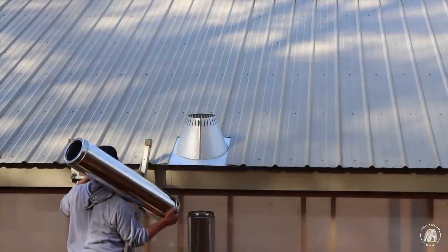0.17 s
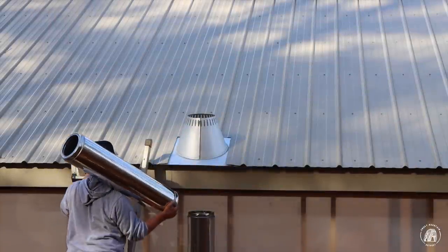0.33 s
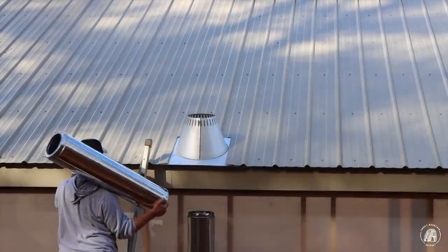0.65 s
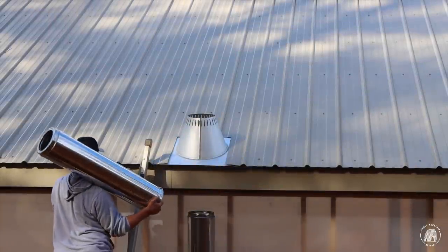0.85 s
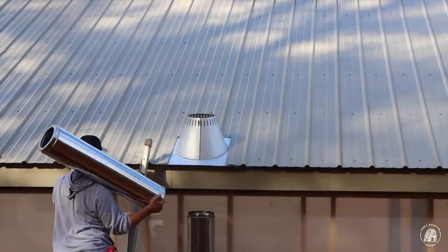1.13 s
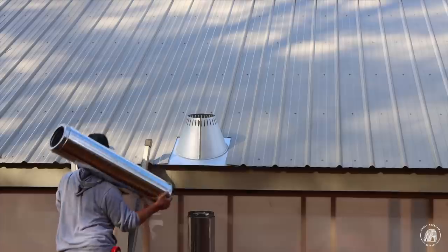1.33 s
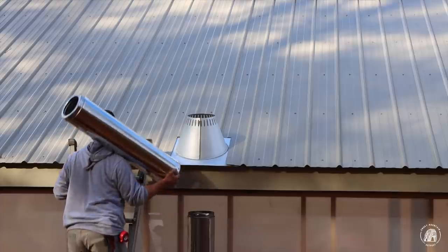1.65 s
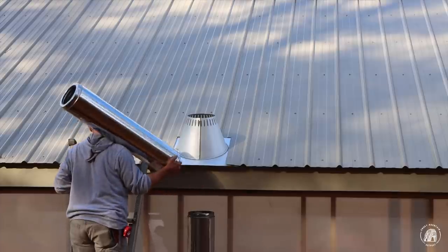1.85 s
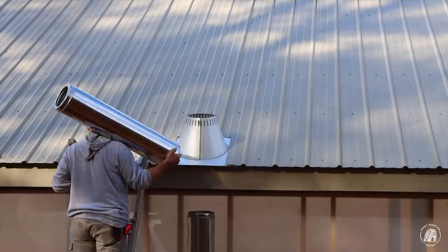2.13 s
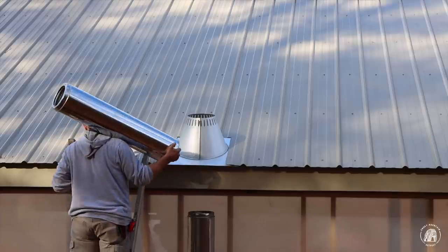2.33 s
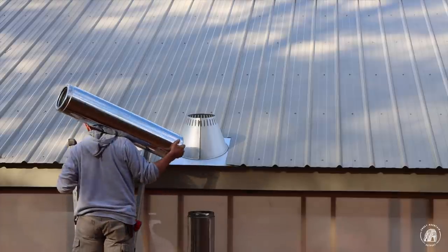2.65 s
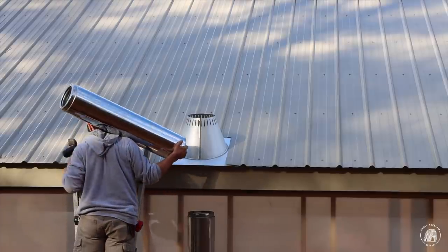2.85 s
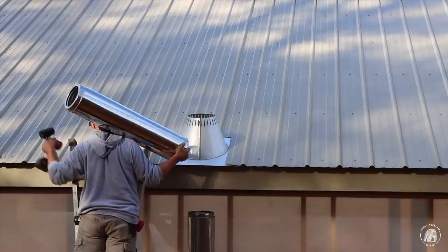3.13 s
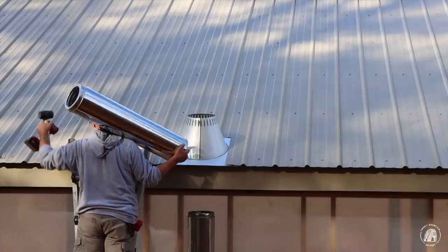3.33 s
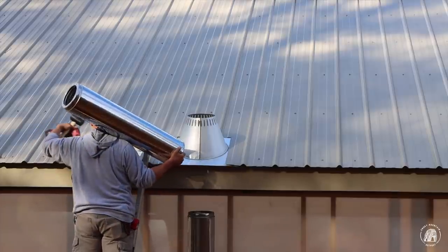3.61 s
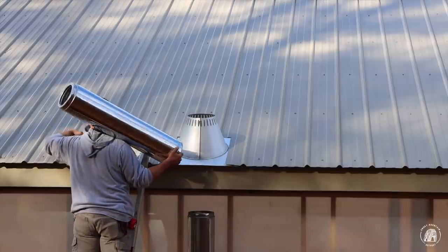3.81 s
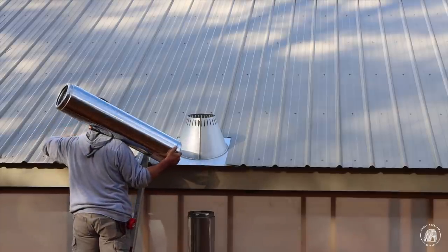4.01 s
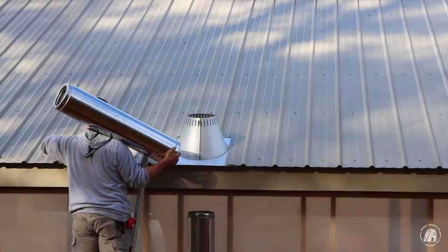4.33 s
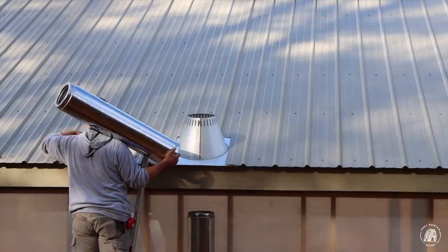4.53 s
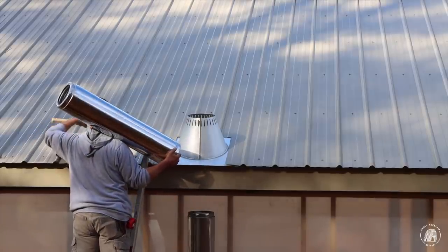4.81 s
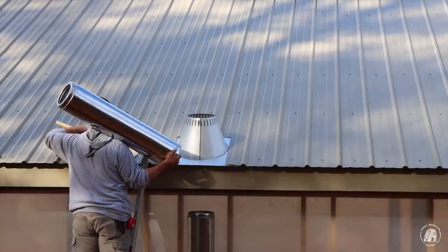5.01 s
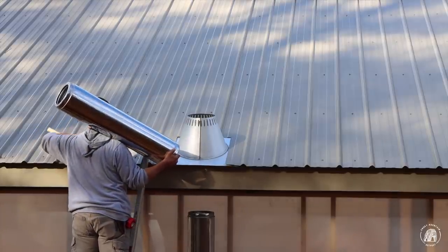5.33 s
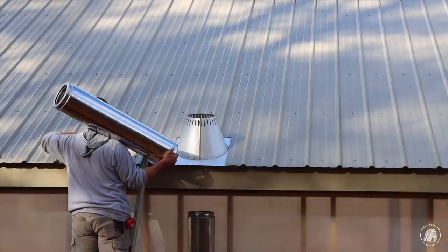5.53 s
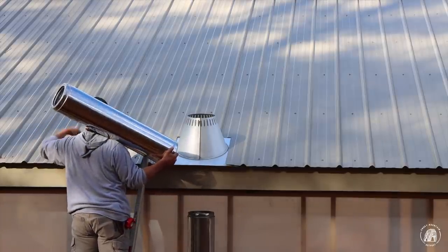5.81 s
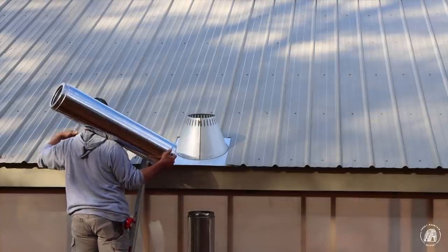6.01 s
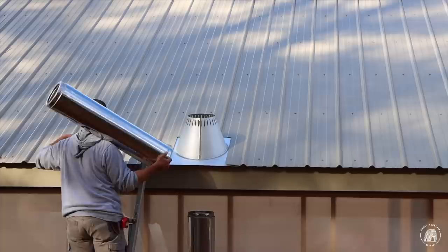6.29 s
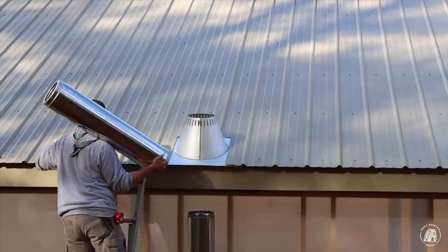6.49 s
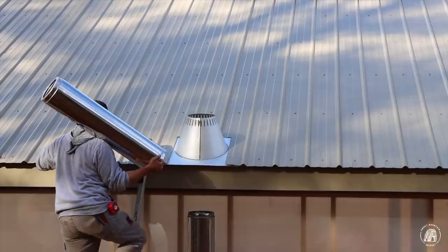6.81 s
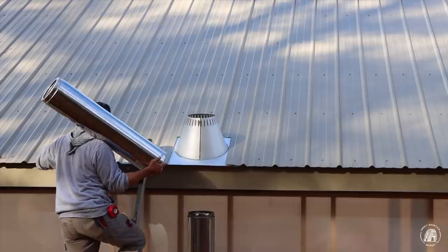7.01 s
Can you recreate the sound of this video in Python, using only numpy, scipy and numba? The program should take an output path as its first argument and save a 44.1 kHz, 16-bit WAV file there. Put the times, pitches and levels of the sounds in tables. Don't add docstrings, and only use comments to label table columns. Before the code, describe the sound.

Quiet outdoor air with low rumble and light hiss, heard in mono from a modest distance. At about 0.06 s a bright aluminium rung clinks, then irregular dull ticks, soft boot thuds and gritty cloth rubbing continue, with another clink at 0.72 and a fuller step around 2.0 to 2.1. From 2.5 to 3.9 it is nearly quiet, with only faint touches and rustle. A low thud at 3.94 leads to a hollow, clattering tool blow on sheet metal at 4.15, with a short sizzle. Duller thuds follow at 4.43 and 4.73 to 4.8. The pipe knocks twice near 5.4, then lands hardest at 5.6: a sharp crack, booming rebounds and loose rattle dying by about 6. Soft rubbing remains, with a tiny tick at 6.5, a latch click at 6.81, and a bright rung clink and step at 7.0. A faint, dull yard echo trails the hits.

```python
import sys
import numpy as np
from scipy import signal
from scipy.fft import rfft, irfft
from scipy.io import wavfile
from scipy.ndimage import uniform_filter1d
from numba import njit

SR = 44100
rng = np.random.default_rng(int(sys.argv[2]) if len(sys.argv) > 2 else 0)


def waveform_to_disk(signal):
    frames = np.transpose(np.atleast_2d(signal))
    scaled = np.clip(frames, -1, 1) * 32767
    samples = np.round(scaled).astype(np.int16)
    wavfile.write(sys.argv[1], SR, samples)


def gain_from_db(level_db):
    decades = np.asarray(level_db, float) / 20
    return 10 ** decades


N = 315315

# mode_hz, level_db_per_hz
SHEET_BOOM = [(35, -46), (60, -34), (129, 0.5), (172, -7), (280, 0.5), (398, -6.5), (429, -4.5),
              (545, -2.5), (1050, -9), (1560, -39), (2640, -120)]
# mode_hz, level_db_per_hz
SHEET_CLANG = [(710, -16), (1200, 1), (1330, -1), (1420, -14), (1610, -15.5), (2120, -11.5), (2390, -11.5),
               (2980, -15), (3600, -17.5), (4200, -24.5), (5790, -34.5), (6860, -30), (8130, -54),
               (15000, -62)]
# mode_hz, t60_s
SHEET_T60 = [(100, 1), (300, 0.8), (700, 0.34), (1500, 0.19), (3500, 0.28), (7000, 0.28), (14000, 0.11)]
# mode_hz, level_above_dense_modes_db
PANELS = [(255, 10), (300, 3), (350, 5.5), (400, 14), (495, -4), (550, 5.5), (595, -13), (680, 9.5),
          (778, 8.5), (805, 4), (855, 7)]
# start_s, level_db, treble_share_db, boom_centre_hz, ring_time_factor
CLIMB = [(0.0, -33, -32, 870, 0.46), (0.468, -41, 1, 580, 0.66), (0.493, -33.5, -15, 276, 0.19),
         (0.7196, -38.5, 12, 760, 0.42), (0.859, -38, 1, 920, 0.54), (0.931, -41, -3, 460, 0.42),
         (1.148, -36.5, 6, 605, 1), (1.213, -35, -1, 740, 1.), (1.267, -32.5, -11, 267, 0.78),
         (1.359, -40.5, 20, 735, 0.71), (1.514, -29.5, -6.5, 890, 0.91), (1.577, -39, -9, 734, 0.69),
         (1.803, -39.5, 14, 845, 0.27), (1.959, -30.5, -16, 398, 0.79), (2.048, -25.5, -11, 900, 0.54),
         (2.078, -34.5, -26, 290, 0.99), (2.162, -37, 0, 845, 0.34), (2.267, -43.5, 6, 750, 0.88),
         (2.407, -51, 5, 900, 1.), (2.837, -40.5, -26, 770, 0.98), (3.468, -37.5, -4, 850, 0.44),
         (3.556, -41.5, -1, 800, 0.46)]
# start_s, level_db, treble_share_db, boom_centre_hz, ring_time_factor
BLOWS = [(3.906, -41, 1, 774, 0.9), (3.9401, -19, -28, 268, 0.28), (3.971, -31.5, -17, 275, 0.88),
         (4.02, -30, -25, 297, 0.64), (4.072, -22, -21, 510, 0.81), (4.149, -9.5, -7, 790, 0.63),
         (4.247, -25, -15, 790, 0.66), (4.426, -22.5, -10.5, 296, 0.85), (4.73, -19, -19, 525, 0.68),
         (4.756, -25.5, -15, 470, 0.23), (4.808, -29, -28, 497, 1.), (5.371, -16.5, -17, 360, 0.64),
         (5.397, -13.5, -17, 470, 0.98), (5.561, -13, -10.5, 492, 1.)]
# start_s, level_db, treble_share_db, boom_centre_hz, ring_time_factor
DESCENT = [
    (6.004, -45, -32, 582, 1.),
    (6.96, -35.5, -1, 785, 1.),
    (7.007, -28.5, -4, 770, 0.99),
    (7.073, -27, -15, 886, 0.34),
]
# start_s, level_db, treble_share_db, boom_centre_hz, ring_time_factor
SHAKES = [
    (5.626, -16.5, -11, 554, 0.94),
    (5.665, -10, -20, 574, 0.55),
    (5.706, -14.5, -15, 545, 1.),
]
# start_s, level_db
CLINKS = [
    (0.059, -26.5),
    (0.7222, -28.5),
    (6.8106, -29.5),
    (7.0058, -24.5),
]
# mode_hz, level_db, t60_s
CLINK_MODES = [
    [(2600, -3, 0.045), (3060, -3, 0.11), (3800, -1, 0.069), (3940, -18, 0.062), (4760, -3, 0.072),
     (5280, 9, 0.032), (5550, -7, 0.061), (6200, -11, 0.024)],
    [(2500, -8, 0.073), (3105, 6, 0.094), (3332, -39, 5.0), (3700, -9, 0.09), (3760, 2, 0.061),
     (4660, -2, 0.069), (9189, -35, 0.36)],
    [(2720, 0.5, 0.071), (2930, -20, 0.15), (3380, -34, 0.23), (3750, -12, 0.084), (3980, -9, 0.088),
     (4850, -7, 0.06), (7596, -50, 1.1)],
    [(2760, -4, 0.065), (3160, 0, 0.12), (3710, -4, 0.18), (5060, -20, 0.097), (5250, 6, 0.027),
     (6100, -32, 0.14), (6900, -24, 0.1), (8040, -7, 0.093), (8930, -11, 0.11)],
]
# start_s, level_db, centre_hz, top_share_db
RUNG_TICKS = [(0.057, -20.5, 5060, 13), (0.368, -38, 2050, -25), (0.495, -31.5, 2260, -23),
              (0.542, -37.5, 2230, -20), (0.639, -38, 2080, -23), (0.7221, -30.5, 2500, -17),
              (0.851, -35, 2140, -21), (1.145, -37.5, 2230, -27), (1.2142, -33, 2410, -24),
              (1.263, -35, 1790, -27), (1.3655, -27.5, 2350, -20.5), (1.511, -34.5, 3050, -26),
              (1.805, -33, 2450, -18.5), (1.993, -35, 3120, 25), (2.0162, -25, 2450, -23),
              (2.054, -28.5, 2600, -23), (2.115, -40, 2200, -16), (2.159, -39, 2080, -31),
              (2.26, -48, 2170, -24), (2.38, -44, 2360, -19), (2.429, -43, 2450, -14),
              (2.488, -37.5, 2570, -19), (3.204, -38, 2600, -16), (3.47, -51, 3210, -11),
              (3.562, -47, 3160, -13)]
# start_s, level_db, centre_hz, top_share_db, rattle_s
EDGE_TICKS = [(3.906, -41, 1780, -29, .019), (3.932, -34.5, 1860, -29, 0.021),
              (4.007, -40.5, 2150, -34, 0.011), (4.153, -24, 2110, -21, 0.017), (4.4, -42, 2460, -31, 0.02),
              (4.427, -33, 2390, -37, 0.01), (4.713, -33, 2000, -33, 0.026), (5.393, -34, 2090, -41, 0.019),
              (5.419, -32, 2250, -31, 0.0084), (5.555, -32, 1935, -27, 0.042),
              (5.612, -43, 3200, -20, 0.033), (6.488, -38, 2450, -21, 0.027), (6.764, -43, 2370, -19, .013),
              (6.812, -29.5, 2800, -23, 0.015), (6.97, -50, 2460, -9, .013), (6.997, -24, 2130, -32, 0.018),
              (7.005, -19, 3600, -5, 0.0078), (7.069, -31, 1760, -40, 0.012)]
# start_s, level_db, centre_hz, rattle_s, t60_s
CRACKS = [
    (0.057, -24, 2310, 0.011, 0.04),
    (5.5996, -5.5, 2620, .002, 0.01),
    (5.601, -27, 3100, 0.012, 0.037),
]
# centre_hz, boost_db
CROWDED_BANDS = [(2450, 0.5), (3400, 3.5), (4900, 5.5), (6800, 3)]
# start_s, level_db, mode_hz, t60_s, second_mode_hz
KNOCKS = [
    (0.4935, -36, 350, .035, 800),
    (4.1565, -16.5, 835, .075, 610),
    (5.3725, -18, 345, .06, 560),
    (5.4005, -19, 380, .035, 600),
    (5.5992, -10, 500, .02, 240),
    (5.6022, -5, 680, .085, 520),
    (5.6225, -11, 620, .07, 520),
]
# start_s, level_db, buzz_s
BUZZES = [
    (4.158, -30, 0.015),
    (5.40, -45, 0.031),
    (5.566, -39, 0.019),
    (5.608, -29, 0.02),
    (5.68, -44, 0.025),
]
# mode_hz, level_db, t60_s
PIPE_WALL = [(2600, -7, 0.039), (2450, -9, 0.083), (3266, -2, 0.088), (3470, -8, 0.027), (3450, 6, 0.022),
             (3820, -6.5, 0.056), (4980, -20, 0.04), (5130, -22, 0.03), (7100, -17, 0.024)]
# start_s, level_db, mode_hz, t60_s, damped_after_s
LATCH_PING = (6.813, -44.5, 1900, .55, .105)
# start_s, level_db, mode_hz, t60_s, second_mode_hz
HUMS = [(0.645, -46.5, 814, .06, 1910), (1.214, -43, 269, .5, 704), (1.522, -38.5, 377, .11, 648),
        (2.47, -53, 847, 0.34, 700), (3.953, -26.5, 295, 0.12, 685), (4.733, -24, 620, 0.1, 700),
        (4.785, -31.5, 434.4, 0.38, 500), (6.815, -51, 773, 0.27, 826), (5.6, -21, 960, 0.04, 1250),
        (2.158, -41, 820, 0.05, 1780), (3.905, -46, 762, 0.087, 1255), (4.15, -30, 141, 0.39, 249),
        (4.44, -35, 800, .12, 556), (5.636, -16.5, 285, .1, 560), (5.415, -22, 395, .15, 530),
        (5.405, -29, 830, .12, 700), (5.70, -22, 280, .2, 900), (5.715, -22, 530, .2, 660),
        (6.497, -45, 850, .05, 600), (3.98, -35, 250, .2, 800), (4.185, -24, 800, .12, 620),
        (4.075, -31, 400, .06, 670), (4.765, -24, 500, .06, 400), (4.235, -28, 750, .1, 290),
        (4.105, -34, 255, .2, 830), (4.722, -37, 560, .05, 300), (5.435, -23, 400, .08, 560),
        (5.76, -24, 550, .1, 300)]
# start_s, level_db, centre_hz, t60_s
SNAPS = [
    (2.0503, -39, 2500, 0.025),
    (4.147, -23, 2600, 0.0052),
    (4.4216, -34, 2500, 0.023),
    (5.3738, -33.5, 1180, 0.024),
    (5.557, -31, 1500, .015),
    (6.497, -45.5, 2050, 0.11),
    (6.498, -47, 3060, 0.073),
    (1.9955, -58, 3530, 0.012),
]
# start_s, level_db, centre_hz, chatter_s
CLATTER = [(2.05, -40.5, 2890, 0.015), (2.09, -50.5, 2360, 0.022), (4.157, -27, 2180, 0.016),
           (4.209, -41, 2400, 0.03), (4.424, -36, 2390, 0.017), (4.723, -45, 2320, 0.024),
           (5.376, -33, 1530, 0.029), (5.43, -42, 1720, 0.028), (5.561, -26.5, 1610, 0.023),
           (5.608, -34, 1760, 0.018), (5.668, -31, 1990, 0.022), (5.731, -41.5, 2200, 0.032),
           (2.361, -57, 2500, 0.04)]
# start_s, level_db
TINKS = [
    (0.7207, -42),
    (1.366, -40.5),
    (1.806, -43.5),
    (1.935, -59),
    (6, -50),
]
# mode_hz, level_db, t60_s
TINK_MODES = [
    [(2480, 5, 0.027), (3980, -1, .1), (5400, -17, 0.046)],
    [(970, 4, 0.055), (1976, -1, .084), (2767, -1, 0.063), (3120, -9, 0.067), (3930, -3, .034),
     (4893, -6.5, .083)],
    [(900, 0, 0.055), (2220, -2, 0.068), (2830, -6, 0.08), (5190, 0, 0.026), (7000, -8, .04)],
    [(4800, 0, 0.093), (8900, -2, 0.071)],
    [(604, 4, .05), (850, -9, 0.057)],
]
# start_s, level_db, rise_s, fall_db_per_s, top_share_db
SIZZLES = [
    (2.02, -50, .03, 200, -13),
    (3.91, -50, 0.033, 150, -14),
    (4.148, -27.5, .012, 175, -6),
    (4.422, -45.5, .006, 170, -12),
    (4.722, -45.5, 0.026, 170, -16),
    (5.374, -36.5, .04, 151, -14),
    (5.557, -37, .015, 122, -21),
    (5.601, -31, 0.0055, 131, -13),
    (7.005, -36.5, 0.0074, 250, -8),
]
# freq_hz, level_db
SIZZLE_MID = [(1000, -3), (1300, 0), (2500, -3), (3600, -4.5), (4300, -10.5), (5500, -16)]
# freq_hz, level_db
SIZZLE_TOP = [(3800, -2), (5000, 5), (6000, -11), (6900, 1.5), (8000, -10.5), (14000, -19)]
# start_s, length_s, level_db, panel_hz, panel_share_db
SCRAPES = [
    (1.19, .17, -52, 760, -3),
    (2.35, .17, -56, 850, 2),
    (0.46, .1, -57, 800, -3),
    (4.26, .12, -48, 800, -8),
    (3.46, .13, -59, 800, -3),
    (1.52, .2, -57, 800, -5),
]
# freq_hz, level_db
SCRAPE_COLOUR = [(300, 3), (900, 10), (1500, -6), (2300, 0.5), (3600, -6), (4300, -14), (8000, -27)]
# time_s, effort_db
EFFORT = [(0.0, -60.5), (0.57, -54), (1.15, -59), (1.39, -46), (1.55, -60), (1.79, -56), (1.99, -63),
          (2.11, -47.5), (2.33, -62), (2.55, -55.5), (3.15, -64.5), (3.96, -61.5), (4.4, -47.5),
          (5.08, -71), (5.9, -58), (6.25, -52), (6.789, -57), (7.15, -53)]
# freq_hz, level_db
RUB_LOW = [(150, -18), (250, -3), (450, -0.5), (800, 4.5), (1000, -5), (1500, -18.5)]
# freq_hz, level_db
RUB_HIGH = [(1000, 3), (1400, 7.5), (2300, 3), (3600, -1.5), (5000, -17), (9000, -16)]
# start_s, level_db
SHUDDERS = [
    (4.149, -32.5),
    (5.43, -28.5),
    (5.6, -18),
]
# start_s, level_db
LEANS = [
    (0.06, -66),
    (4.95, -67),
    (6.33, -62),
    (7.03, -45),
    (7.1, -63),
]
# freq_hz, level_db_per_hz
AIR = [(12, -48), (20, -1), (55, 1), (130, -1), (204, -5.5), (262, -5.5), (357, -9), (472, -7.5),
       (624, -13), (780, -7.5), (873, -10), (1760, -20.5), (2140, -17.5), (14700, -23), (16000, -24)]

STEP_RATTLE_S, BLOW_RATTLE_S, SHAKE_RATTLE_S = 0.026, 0.032, 0.04
RUNG_RATTLE_S, TICK_T60_S, CRACK_TOP_DB = 0.0097, 0.055, -36
CONTACT_DB, CONTACT_SHARE = -63, 0.44
SETTLE_DB, SETTLE_S = 8.5, 1
SHUDDER_RISE_S, FRAME_FALL_DB_S, CONTACT_FALL_DB_S, SHUDDER_HIGH_DB = 0.0016, 80, 127, -20.5
AIR_DB, TRAFFIC_DB = -54.5, -58
SWAY_DB, SWAY_SHARE, SWAY_FALL_DB_S, SWAY_RISE_S = -46, 0.92, 54.5, 0.036
TOP_FALL_FACTOR = 2


def evened(x):
    return x / np.sqrt(np.mean(x ** 2) + 1e-20)


def read(points, hz):
    f, value = np.transpose(points)
    return np.interp(np.log(hz + 1), np.log(f + 1), value)


def add(mix, start_s, sound):
    part = mix[max(round(start_s * SR), 0):][:len(sound)]
    part += sound[:len(part)]


@njit
def ring(hz, gain, t60, size, rate):
    out = np.zeros(size)
    for k in range(len(hz)):
        step = np.exp((2j * np.pi * hz[k] - np.log(1000) / t60[k]) / rate)
        z = gain[k] + 0j
        for n in range(min(size, int(t60[k] * rate))):
            out[n] += z.imag
            z *= step
    return out


def struck(body, rattle_s, blow, rise_s):
    t = np.arange(4096) / SR
    u = t / max(rattle_s, .001)
    hits = rng.standard_normal(4096) * (rng.random(4096) < .08)
    spray = hits * np.sqrt(u) * np.exp(-u)
    spray /= np.linalg.norm(spray)
    spray[0] += blow
    onset = np.minimum(np.arange(len(body)) / SR / max(rise_s, 1e-4), 1) ** 2
    sound = signal.fftconvolve(body * onset, spray)
    return sound / np.sqrt(uniform_filter1d(sound ** 2, 256).max())


def tuned(start_s, level_db, modes, rattle_s, blow, rise_s):
    hz, mode_db, t60_s = np.transpose(modes)
    body = ring(hz, gain_from_db(mode_db), np.clip(t60_s, .005, .45), 20000, SR)
    return start_s, gain_from_db(level_db) * struck(body, rattle_s, blow, rise_s)


def scatter(count):
    sign, size, spread = rng.random((3, count))
    return np.sign(sign - .5) * (0.24 + size), 0.67 + .5 * spread


def aftershock(hits, rise_s, fall_db_s):
    out, t = np.zeros(N), np.arange(SR) / SR
    for start_s, level_db in hits:
        add(out, start_s, gain_from_db(level_db - fall_db_s * t) * np.minimum(t / max(rise_s, .001), 1))
    return out


def noise(points, patchy_db, gritty_db):
    frames, hz = N // 128 + 5, np.fft.rfftfreq(512, 1 / SR)
    a, b, patches = rng.standard_normal((frames, 257, 3)).T
    patches = evened(uniform_filter1d(uniform_filter1d(patches, 5, 0), 20, 1))
    flicker = evened(uniform_filter1d(rng.standard_normal(frames), 5))
    outside = (hz < points[0][0]) | (hz > points[-1][0])
    colour_db = np.where(outside, -90, read(points, hz))[:, None]
    z = (a + 1j * b) * gain_from_db(colour_db + patchy_db * patches + gritty_db * flicker)
    return evened(signal.istft(z, nperseg=512, noverlap=384)[1][:N])


def sheet():
    out = np.zeros(N)
    dense = np.sort(60 + 14000 * rng.random(1200) ** 2.3)
    spacing = np.sqrt(np.gradient(uniform_filter1d(dense, 15, mode="nearest")) + 0.2)
    panel_hz, panel_db = np.transpose(PANELS)
    hz = np.append(dense, panel_hz)
    weight = np.append(spacing, np.interp(panel_hz, dense, spacing) * gain_from_db(panel_db))
    upper = np.clip(np.log2(hz / 1000) * 2, 0, 1)
    kinds = [(CLIMB, STEP_RATTLE_S), (BLOWS, BLOW_RATTLE_S), (DESCENT, STEP_RATTLE_S), (SHAKES, SHAKE_RATTLE_S)]
    thuds = [(*row, rattle_s) for rows, rattle_s in kinds for row in rows]
    for start_s, level_db, treble_db, boom_hz, ringing, rattle_s in thuds:
        boom_db = 7.4 * np.exp(-(np.log(hz / boom_hz) / 0.18) ** 2)
        boom_db += 9.5 * np.minimum(np.log2(hz / boom_hz / 0.35), 0)
        boom_db -= 0.65 * np.maximum(np.log2(hz / boom_hz), 0)
        colour_db = (1 - upper) * (read(SHEET_BOOM, hz) + boom_db)
        colour_db += upper * (read(SHEET_CLANG, hz) + treble_db + 0.5)
        place, spread = scatter(len(hz))
        t60_s = read(SHEET_T60, hz) * max(ringing, .1) * spread
        body = ring(hz, gain_from_db(colour_db) * weight * place / np.sqrt(t60_s), t60_s, 30000, SR)
        thud = struck(body, rattle_s, blow=0.034 / max(rattle_s, .002), rise_s=0.0012)
        add(out, start_s, gain_from_db(level_db - 7.0) * thud)
    return out


def ladder():
    out = np.zeros(N)
    hz = np.sort(700 + 15000 * rng.random(500) ** 1.6)
    for (start_s, level_db), modes in zip(CLINKS, CLINK_MODES):
        add(out, *tuned(start_s, level_db - 8, modes, rattle_s=.004, blow=3, rise_s=.0003))
    ticks = [(*row, RUNG_RATTLE_S, TICK_T60_S) for row in RUNG_TICKS]
    ticks += [(*row, TICK_T60_S) for row in EDGE_TICKS]
    ticks += [(s, db, centre_hz, CRACK_TOP_DB, rattle_s, t60_s) for s, db, centre_hz, rattle_s, t60_s in CRACKS]
    crowding_db = sum(db * np.exp(-(np.log(hz / band_hz) / 0.07) ** 2) for band_hz, db in CROWDED_BANDS)
    for start_s, level_db, centre_hz, top_db, rattle_s, t60_s in ticks:
        top = gain_from_db(top_db + 3.5 - 7.0 * np.log2(hz / 9600.0)) * np.clip(hz / 2730.0 - 1, 0, 1)
        colour = np.exp(-(np.log(hz / centre_hz) / 0.4) ** 2) + top
        colour *= gain_from_db(crowding_db)
        place, spread = scatter(500)
        mode_t60_s = max(t60_s, .004) * spread * (3000 / hz) ** 0.23
        body = ring(hz, colour * place, mode_t60_s, 9000, SR)
        tick = struck(body, rattle_s, blow=0.0086 / max(rattle_s, .002), rise_s=0.00047)
        add(out, start_s, gain_from_db(level_db - 13.0) * tick)
    return out


def knocks():
    out = np.zeros(N)
    for start_s, level_db, hz, t60_s, second_hz in KNOCKS:
        modes = [(hz, 0, t60_s), (second_hz, -7, 1.2 * t60_s)]
        add(out, *tuned(start_s, level_db, modes, rattle_s=.003, blow=12., rise_s=.0015))
    out = signal.sosfilt(signal.butter(2, 170, "highpass", fs=SR, output="sos"), out)
    for start_s, level_db, buzz_s in BUZZES:
        add(out, *tuned(start_s, level_db, PIPE_WALL, buzz_s, blow=0.16, rise_s=0.0015))
    start_s, level_db, hz, t60_s, damped_s = LATCH_PING
    t = np.arange(9000) / SR
    ping_db = level_db - 60 * t / t60_s - 600 * np.maximum(t - damped_s, 0)
    add(out, start_s, gain_from_db(ping_db) * np.sin(2 * np.pi * hz * t) * np.minimum(t / .004, 1))
    return out


def hums():
    out = np.zeros(N)
    for start_s, level_db, hz, t60_s, second_hz in HUMS:
        modes = [(hz, 0, t60_s), (second_hz, -4, t60_s)]
        add(out, *tuned(start_s, level_db, modes, rattle_s=0.014, blow=3.1, rise_s=0.0044))
    return out


def snaps():
    out = np.zeros(N)
    for start_s, level_db, centre_hz, t60_s in SNAPS:
        spread = rng.uniform(-1.1, 1, 9)
        modes = [(centre_hz * np.exp(.35 * u), -6 * u ** 2, t60_s) for u in spread]
        add(out, *tuned(start_s, level_db, modes, rattle_s=.003, blow=8., rise_s=.0007))
    return out


def clatter():
    out = np.zeros(N)
    for start_s, level_db, centre_hz, chatter_s in CLATTER:
        spread = rng.uniform(-1.0, 1, 80)
        modes = [(centre_hz * np.exp(.65 * u), -9 * u ** 2 - 4 * u, .015) for u in spread]
        add(out, *tuned(start_s, level_db, modes, chatter_s, blow=.05, rise_s=.001))
    return out


def tinks():
    out = np.zeros(N)
    for (start_s, level_db), modes in zip(TINKS, TINK_MODES):
        add(out, *tuned(start_s, level_db, modes, rattle_s=0.0059, blow=2.5, rise_s=0.0004))
    return out


def sizzle():
    mid, top = np.zeros(N), np.zeros(N)
    for start_s, level_db, rise_s, fall_db_s, top_db in SIZZLES:
        mid += aftershock([(start_s, level_db)], rise_s, fall_db_s)
        top += aftershock([(start_s, level_db + top_db)], rise_s, fall_db_s * TOP_FALL_FACTOR)
    mid *= noise(SIZZLE_MID, patchy_db=4.0, gritty_db=4.0)
    return mid + top * noise(SIZZLE_TOP, patchy_db=3.5, gritty_db=1.5)


def scrapes():
    out, drive = np.zeros(N), rng.standard_normal(N)
    grit = noise(SCRAPE_COLOUR, patchy_db=2.5, gritty_db=1.0)
    for start_s, length_s, level_db, panel_hz, panel_db in SCRAPES:
        at = slice(round(start_s * SR), round((start_s + length_s) * SR))
        panel = evened(signal.lfilter(*signal.iirpeak(panel_hz, 14., SR), drive[at]))
        swell = np.sin(np.linspace(0, np.pi, len(panel))) ** 0.82
        add(out, start_s, gain_from_db(level_db) * swell * (grit[at] + gain_from_db(panel_db) * panel))
    return out


def rubbing():
    t = np.arange(N) / SR
    effort_db = np.interp(t, *np.transpose(EFFORT))
    low = gain_from_db(effort_db) + aftershock(SHUDDERS, SHUDDER_RISE_S, FRAME_FALL_DB_S)
    settle_db = SETTLE_DB * np.exp(-t / SETTLE_S)
    high = gain_from_db(CONTACT_DB + CONTACT_SHARE * (effort_db + 55.5) + settle_db)
    high += gain_from_db(SHUDDER_HIGH_DB) * aftershock(SHUDDERS, SHUDDER_RISE_S, CONTACT_FALL_DB_S)
    low *= noise(RUB_LOW, patchy_db=3.5, gritty_db=1.0)
    return low + high * noise(RUB_HIGH, patchy_db=1.0, gritty_db=2.5)


def yard(x, start_s, t60_s):
    t = np.arange(SR // 2) / SR
    taps = rng.choice([-1., 1.], len(t)) * (rng.random(len(t)) < .05)
    taps *= gain_from_db(-60 * t / t60_s) * np.clip((t - start_s) / 0.031, 0, 1)
    taps = signal.lfilter([1], [1, -.6], taps)
    return signal.fftconvolve(x, taps / np.linalg.norm(taps))[:N]


def outdoors():
    band = signal.butter(2, [60., 118.], "bandpass", fs=SR, output="sos")
    low = signal.sosfilt(band, rng.standard_normal(N))
    thuds = CLIMB + BLOWS + DESCENT + SHAKES
    pushes = [(start_s, SWAY_DB + SWAY_SHARE * (level_db + 13.0)) for start_s, level_db, *_ in thuds]
    sway = aftershock(pushes + LEANS, SWAY_RISE_S, SWAY_FALL_DB_S)
    rumble = (gain_from_db(TRAFFIC_DB) + sway) * evened(low)
    hz = np.fft.rfftfreq(N, 1 / SR)
    air = irfft(rfft(rng.standard_normal(N)) * gain_from_db(read(AIR, hz)), N)
    return gain_from_db(AIR_DB) * evened(air) + rumble


def scene():
    metal = sheet() + ladder() + knocks()
    contacts = hums() + snaps() + clatter() + tinks() + sizzle()
    echo = gain_from_db(-23.0) * yard(metal, start_s=0.039, t60_s=0.88)
    return (metal + echo + contacts + scrapes() + rubbing() + outdoors())[None]


def band_limit(x):
    return signal.sosfilt(signal.butter(12, 16290, fs=SR, output="sos"), x)


def record(dry):
    power_db = 10 * np.log10(abs(uniform_filter1d(dry[0] ** 2, 400)) + 1e-12)
    fall_db = np.arange(N) * 35.0 / SR
    held_db = np.maximum.accumulate(power_db + fall_db) - fall_db
    over_db = np.maximum(held_db + 16.0, 0)
    keep = np.exp(-1 / (0.051 * SR))
    dip_db = .5 * signal.lfilter([1 - keep], [1, -keep], over_db)
    ducked = np.clip(dry / gain_from_db(dip_db), -.97, .97)
    edge = signal.firwin(1023, 15850, window=("kaiser", 9), fs=SR)
    mix = signal.oaconvolve(ducked, edge[None], "same")
    return band_limit(mix)


dry = scene()
out = record(dry)
waveform_to_disk(out)
```